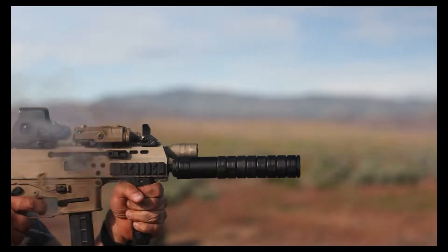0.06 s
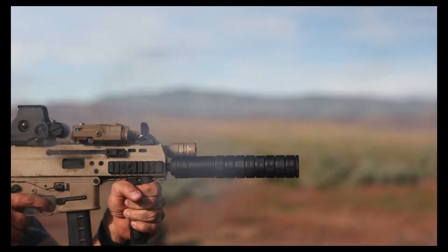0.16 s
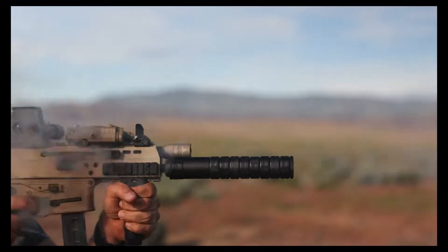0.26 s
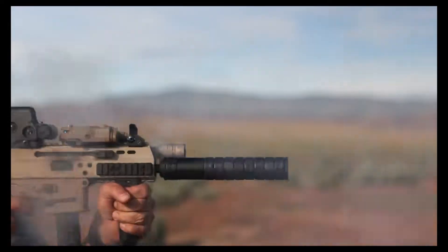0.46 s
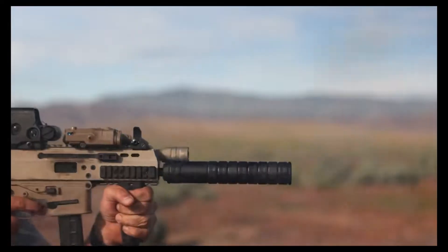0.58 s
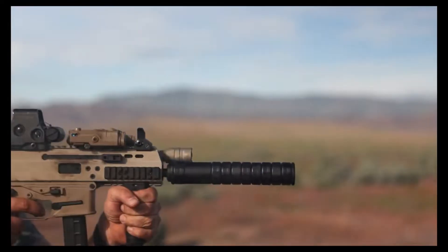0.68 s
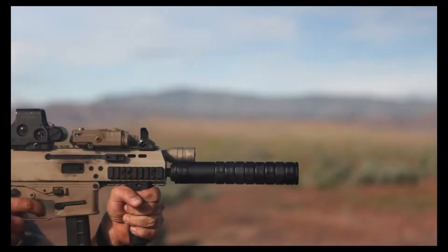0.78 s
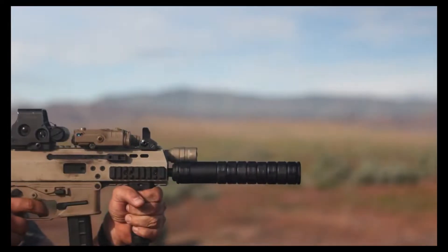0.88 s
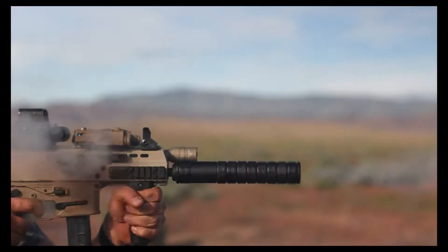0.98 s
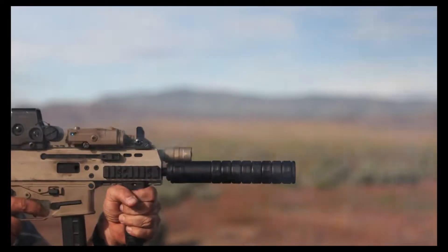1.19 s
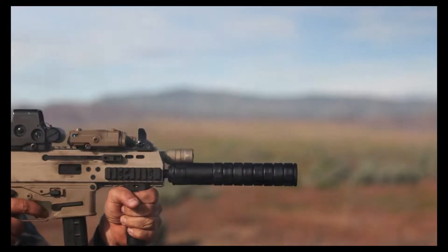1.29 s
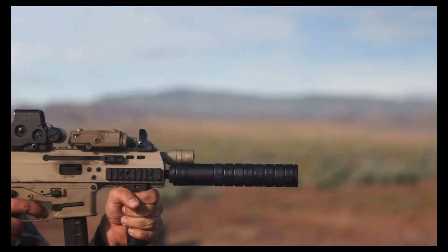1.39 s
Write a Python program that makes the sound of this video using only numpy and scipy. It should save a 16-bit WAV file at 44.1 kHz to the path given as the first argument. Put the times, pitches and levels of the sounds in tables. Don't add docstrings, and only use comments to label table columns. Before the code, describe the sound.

Muffled rifle shots, three quick and one later, with sharp metallic action noise on a windy plain

```python
import sys
import numpy as np
from scipy import signal
from scipy.io import wavfile

SR = 44100
rng = np.random.default_rng(int(sys.argv[2]) if len(sys.argv) > 2 else 0)


def ratio(d):
    e = np.asarray(d, float) / 20
    return 10 ** e


def pcm_store(signal):
    levels = np.round(np.clip(np.atleast_2d(signal), -1, 1) * 32767)
    wavfile.write(sys.argv[1], SR, levels.astype(np.int16).T)


N = 63945
T = np.arange(N) / SR

FIRED_S = np.array([.1038, .3092, .4777, 1.0423])
SLAM_S = FIRED_S + np.array([.0492, .0488, .0488, .0490])

# hollow_note_db, hollow_note_hz, low_push_db
SHOT_VOICES = [
    (-6, 800, -20),
    (-0.5, 440, 2.5),
    (0.5, 660, 1),
    (2.5, 740, -5),
]
# hammer_db, slide_db, slam_db, echo_db
SHOT_PARTS = [
    (-29, -36, -18, -41),
    (-24, -35.5, -16, -40.5),
    (-33.5, -34, -16.5, -38.5),
    (-29.5, -35, -16, -41.5),
]


def rms_one(x):
    return x / np.sqrt(np.mean(x ** 2) + 1e-20)


def drift(rate_hz):
    r = np.exp(-2 * np.pi * rate_hz / SR)
    wander = signal.lfilter([1], [1, -2 * r, r * r], rng.standard_normal(N + SR))
    return rms_one(wander[SR:])


def steep(x, hz, kind):
    return signal.sosfilt(signal.butter(4, hz, kind, fs=SR, output="sos"), x)


def resonance(x, hz, width_hz):
    r = np.exp(-np.pi * width_hz / SR)
    gain = (1 - r * r) / 2
    return signal.lfilter([gain, 0, -gain], [1, -2 * r * np.cos(2 * np.pi * hz / SR), r * r], x + 1e-18)


def noise(spectrum, peaks=(), patchy_db=0., rate_hz=60.):
    peak_share_db = 7.4
    hz, db = np.transpose(spectrum)
    count = int(2.5 * np.log2(hz[-1] / hz[0])) + 1
    edges = np.geomspace(hz[0], min(hz[-1], SR / 2.3), count)
    white = rng.standard_normal((3, N))
    out = 0
    for k, (low, high) in enumerate(zip(edges, edges[1:])):
        band_filter = signal.butter(2, [low, high], "band", fs=SR, output="sos")
        band = signal.sosfilt(band_filter, white[k % 2])
        band_db = np.interp(np.log(low * high) / 2, np.log(hz), db)
        out = out + band * ratio(band_db + patchy_db * drift(rate_hz))
    for k, (peak_hz, width_hz, peak_db) in enumerate(peaks):
        sign = (-1) ** k
        out = out + sign * ratio(peak_db + peak_share_db) * resonance(white[2], peak_hz, width_hz)
    return rms_one(out)


def envelope(starts_s, levels_db, rise_s, hold_s, t60_s):
    age = T - np.reshape(starts_s, (-1, 1))
    rise = np.clip(age / rise_s, 0, 1)
    release = ratio(-60 * np.clip(age - rise_s - hold_s, 0, 9) / t60_s)
    return (ratio(np.reshape(levels_db, (-1, 1))) * rise * release).sum(axis=0)


def ring(starts_s, hz, db, t60_s):
    age = np.clip(T - np.reshape(starts_s, (-1, 1)), 0, 9)
    return (ratio(db) * np.sin(2 * np.pi * hz * age) * ratio(-60 * age / t60_s)).sum(axis=0)


def gas_burst():
    # pitch_hz, level_db (per Hz)
    gas_colour = [(500, -5.5), (1300, 5), (1900, -10), (2900, -5), (4200, -18.5), (5500, -9.5),
                  (13000, -11), (16000, -25.5)]
    # pitch_hz, width_hz, level_db
    gas_peaks = [(843, 180, -2.5), (2110, 60, -2), (2904, 240, -0.5), (5536, 430, -4.5), (7300, 120, -9.5),
                 (13300, 70, -7.5)]
    burst = envelope(FIRED_S, 4, rise_s=.0002, hold_s=.0017, t60_s=.009)
    bounce = envelope(FIRED_S + .0035, -20.5, rise_s=.0015, hold_s=.0015, t60_s=0.03)
    blast = (burst + bounce) * noise(gas_colour, gas_peaks, patchy_db=2.5, rate_hz=89)
    return steep(blast, 562, "high")


def suppressor_note():
    hollow_db, hollow_hz, push_db = np.transpose(SHOT_VOICES)[:, :, None]
    hollow = ring(FIRED_S + .0012, hollow_hz, hollow_db, t60_s=.009)
    push = ring(FIRED_S, 195, push_db, t60_s=.011)
    return hollow + steep(push, 60, "high")


def gas_bleed():
    # pitch_hz, level_db (per Hz)
    bleed_colour = [(290, -42.5), (500, -5.5), (3150, -5.5), (4800, -2), (5550, -6), (8700, -19),
                    (12500, -14.5), (16000, -23)]
    hiss = envelope(FIRED_S, -23, rise_s=0.0043, hold_s=0.0014, t60_s=0.078)
    return hiss * noise(bleed_colour, patchy_db=1.0, rate_hz=40)


def hammer_fall():
    # pitch_hz, level_db (per Hz)
    hammer_colour = [(590, -45), (1000, -8), (3580, -2), (4260, -10), (7610, -15.5), (9940, -13),
                     (16000, -29)]
    hammer_db = np.transpose(SHOT_PARTS)[0]
    fall_s = FIRED_S - .0083
    knock = noise(hammer_colour, patchy_db=-0.5, rate_hz=200)
    hit = envelope(fall_s, hammer_db, rise_s=.0006, hold_s=.0016, t60_s=.008) * knock
    uncovered = envelope(FIRED_S, 0, rise_s=.0003, hold_s=.03, t60_s=.01) < .01
    rattle = envelope(fall_s, hammer_db - 15.5, rise_s=0.0016, hold_s=0.0017, t60_s=0.078)
    return hit + uncovered * rattle * steep(knock, 7200, "low")


def bolt_slide():
    # pitch_hz, level_db (per Hz)
    slide_colour = [(290, -49.5), (500, -18), (831, -13), (3390, 1), (5710, -12), (6230, -11.5),
                    (16000, -29.5)]
    slide_db = np.transpose(SHOT_PARTS)[1]
    scrape = envelope(SLAM_S - .018, slide_db, rise_s=.010, hold_s=0.0048, t60_s=.03)
    return scrape * noise(slide_colour, patchy_db=-0.5, rate_hz=150)


def bolt_slam():
    # pitch_hz, level_db (per Hz)
    steel_colour = [(180, -51.5), (300, -13), (4020, -0.5), (5610, -18), (6300, -20), (10700, -6.5),
                    (16000, -24)]
    # pitch_hz, width_hz, level_db
    steel_peaks = [(1600, 77, -1.5), (3130, 300, -0.5), (4930, 330, -0.5), (6100, 590, -5),
                   (7760, 310, -7.5), (8160, 440, -8), (9800, 130, -9), (13800, 210, -7)]
    slam_db = np.transpose(SHOT_PARTS)[2]
    clack = envelope(SLAM_S, slam_db, rise_s=.0002, hold_s=.001, t60_s=.017)
    tail = envelope(SLAM_S, slam_db - 22, rise_s=.001, hold_s=.001, t60_s=.09)
    return (clack + tail) * noise(steel_colour, steel_peaks, patchy_db=-4.5, rate_hz=110)


def steel_ring():
    # pitch_hz, level_db, t60_s
    steel_parts = [(4328, -63, .65), (8600, -73, .35), (12270, -75, .9), (13400, -79, .8)]
    out = ring([0], 7294, -75, t60_s=.35)
    for hz, db, t60_s in steel_parts:
        out = out + ring(SLAM_S, hz, db, t60_s) * ratio(2.5 * drift(20))
    return out


def trigger_ticks():
    # start_s, level_db, pitch_hz
    tick_events = [
        (0.2717, -44, 2900),
        (0.613, -56, 3430),
        (.654, -69, 2786),
        (0.667, -60, 3800),
        (0.984, -50.5, 2820),
        (1.217, -56.5, 3500),
        (1.2239, -22, 3480),
        (1.2292, -46, 2240),
        (1.41, -44.5, 3600),
        (1.4087, -50, 3120),
    ]
    width_hz, body_hz = 1800, 1500
    snap_noise = steep(rng.standard_normal(N), 12500, "low")
    snap_noise = steep(snap_noise, 8000, "high")
    out = np.zeros(N)
    for start_s, db, hz in tick_events:
        click = np.zeros(N)
        click[int(start_s * SR)] = ratio(db) * SR / width_hz
        once = resonance(click, hz, width_hz)
        out += resonance(once, hz, width_hz) / 2
        body = resonance(click, body_hz, body_hz)
        out += ratio(-9) * steep(body, 4900, "low") / 2
        out += envelope([start_s], [db - 27], rise_s=.0002, hold_s=.0003, t60_s=.004) * snap_noise
    return out


def bank_echo():
    # pitch_hz, level_db (per Hz)
    echo_colour = [(290, -27), (500, -8), (1640, -1.5), (4600, -6), (5310, -9.5), (13100, -24.5),
                   (16000, -34.5)]
    echo_db = np.transpose(SHOT_PARTS)[3]
    delay_s = np.array([.0885, .0815, .0955, .0862])
    answer = envelope(FIRED_S + delay_s, echo_db, rise_s=0.00062, hold_s=.005, t60_s=.085)
    return answer * noise(echo_colour, patchy_db=1.5, rate_hz=100)


def plain_scatter():
    # pitch_hz, level_db (per Hz)
    scatter_colour = [(760, -39), (1300, -0.5), (2240, -2), (4490, 2.5), (8080, -19.5), (13800, -16),
                      (16000, -27)]
    wash = envelope([-.21, *FIRED_S], -63, rise_s=0.013, hold_s=.17, t60_s=.24)
    return wash * steep(noise(scatter_colour, patchy_db=5.0, rate_hz=150), 1200, "high")


def wind():
    # time_s, level_db
    gusts = [(0.0, -39.5), (0.108, -42.5), (0.25, -43), (0.52, -39), (0.674, -46), (0.802, -43.5),
             (0.896, -42.5), (1.02, -41), (1.23, -43), (1.36, -41.5), (1.45, -46)]
    # pitch_hz, level_db (per Hz)
    wind_colour = [(12, -39.5), (20, -1.5), (91, -3), (129, -5), (181, -4.5), (779, -33), (1400, -56.5),
                   (1820, -82), (3080, -120)]
    duck_db, recover_s = -18.5, 0.11
    age = T - FIRED_S[:, None]
    duck = duck_db * (age > 0) * np.clip(1.5 - age / recover_s, 0, 1)
    rumble = steep(noise(wind_colour, patchy_db=1.5, rate_hz=4), 1150, "low")
    lumps = rumble * ratio(1.5 * drift(3))
    strength_db = np.interp(T, *np.transpose(gusts)) + 8
    return ratio(strength_db + duck.min(axis=0)) * lumps


def recorder_hiss():
    hiss = rms_one(resonance(rng.standard_normal(N), 3000, 6000))
    return ratio(-80 + 3 * drift(30)) * hiss


def scene():
    shots = gas_burst() + suppressor_note() + gas_bleed()
    action = hammer_fall() + bolt_slide() + bolt_slam() + steel_ring()
    surroundings = bank_echo() + plain_scatter()
    mix = shots + action + trigger_ticks() + surroundings + wind() + recorder_hiss()
    return mix[None]


def band_limit(x):
    return signal.sosfilt(signal.butter(12, 16140, fs=SR, output="sos"), x)


def record(dry):
    top, knee = 1.0, 6.0
    overloaded = dry / (1 + np.abs(dry / top) ** knee) ** (1 / knee)
    return band_limit(overloaded)


dry = scene()
out = record(dry)
pcm_store(out)
```